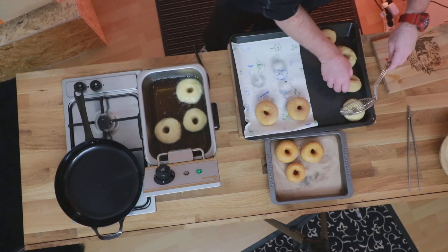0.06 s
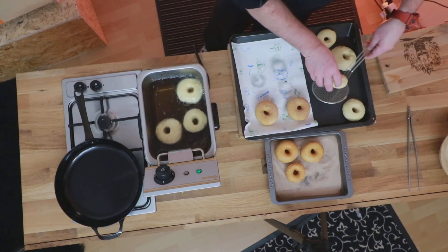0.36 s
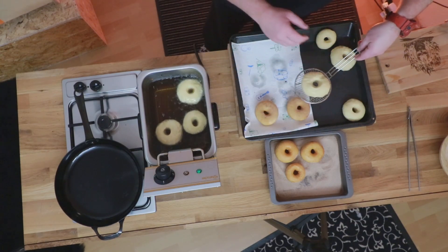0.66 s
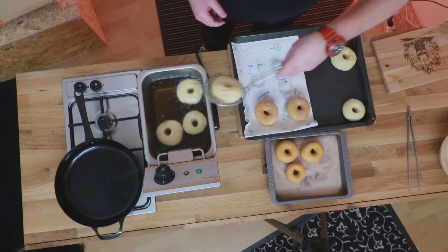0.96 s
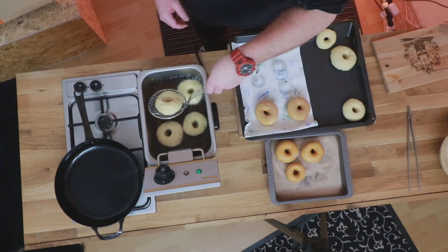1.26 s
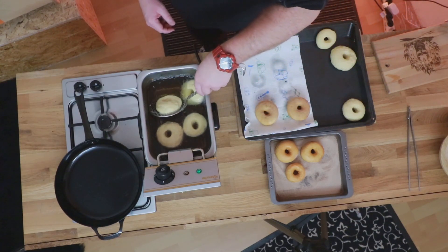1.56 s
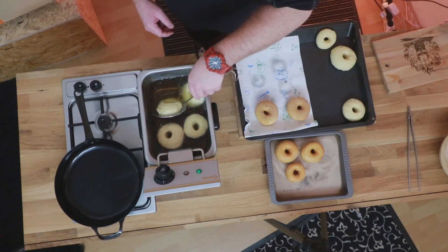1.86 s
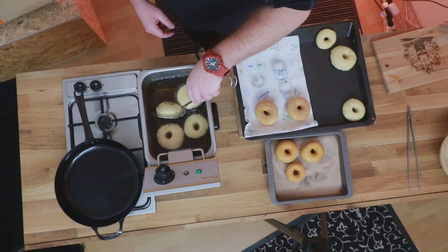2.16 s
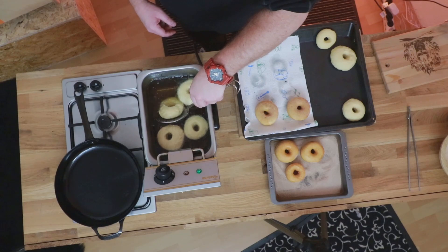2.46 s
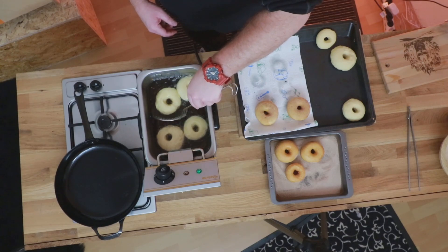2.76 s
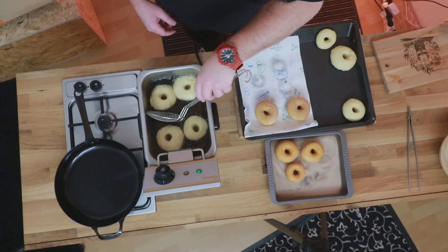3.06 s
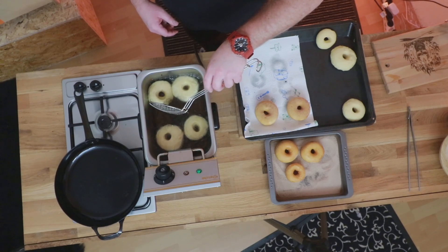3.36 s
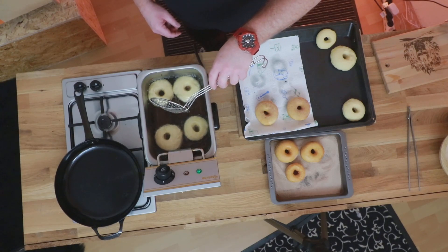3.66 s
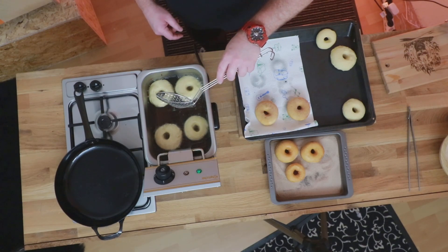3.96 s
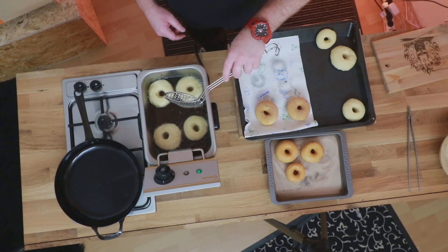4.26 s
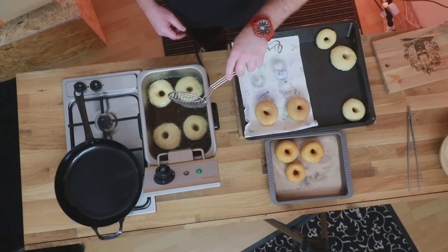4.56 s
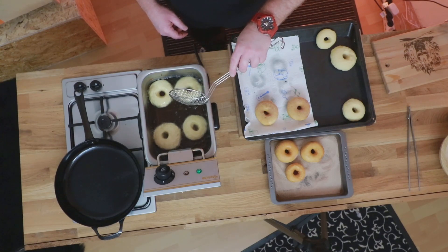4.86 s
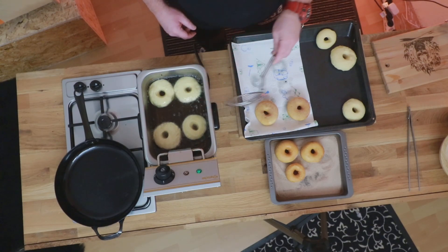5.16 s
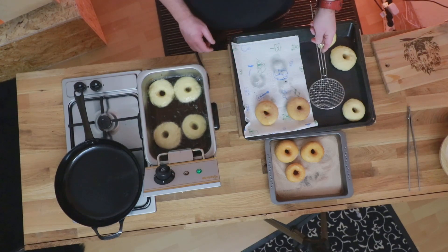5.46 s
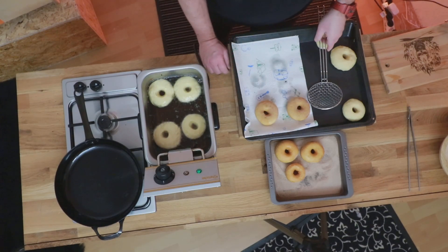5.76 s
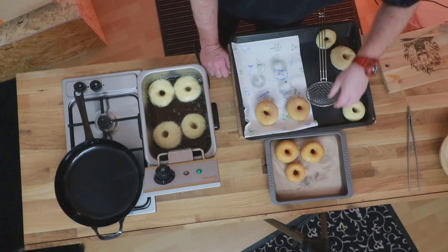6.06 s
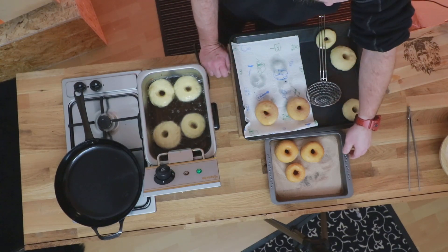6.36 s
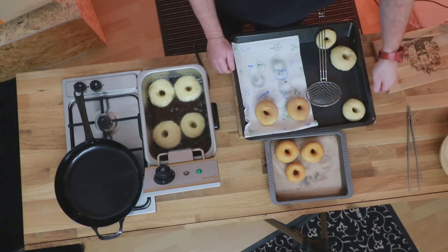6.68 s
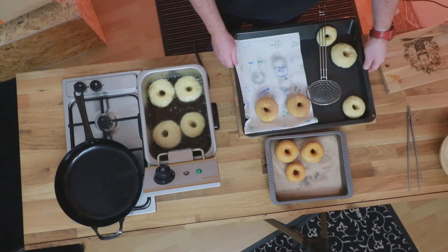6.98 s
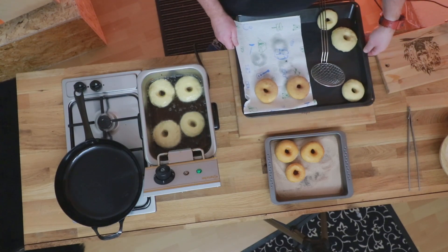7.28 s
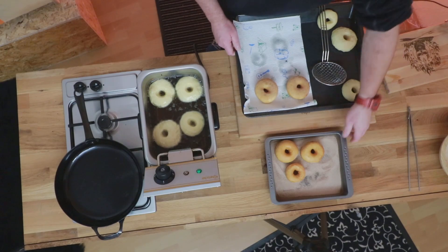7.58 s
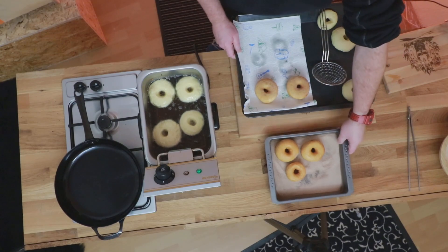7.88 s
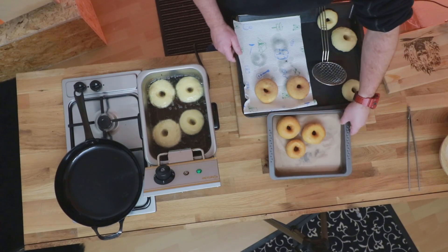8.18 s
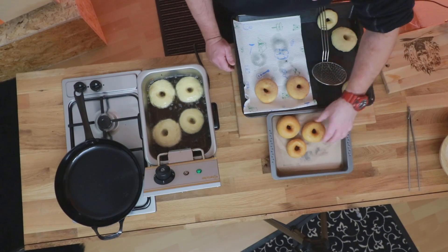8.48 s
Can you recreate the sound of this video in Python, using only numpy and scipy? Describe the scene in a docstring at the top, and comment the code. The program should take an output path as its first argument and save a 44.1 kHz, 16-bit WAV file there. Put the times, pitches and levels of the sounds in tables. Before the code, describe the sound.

Over faintly sizzling oil, a skimmer raps a fryer's rim and rattles onto a tray before a tin clonks against it.

```python
"""A wire skimmer works a doughnut fryer in a small kitchen: it lowers the dough in, knocks and scrapes
along the tank and is rapped on the rim, then dropped on a baking tray. The tray and a smaller tin slide
over the wooden worktop and knock together. Each hit is a set of ringing modes with a noisy crack and
tail; each scrape is a stream of tiny slips. Underneath, bursting steam bubbles keep the hot oil
sizzling faintly over a low room tone."""
import sys
import numpy as np
from scipy import signal
from scipy.fft import rfft, irfft
from scipy.io import wavfile

SR = 44100
rng = np.random.default_rng(int(sys.argv[2]) if len(sys.argv) > 2 else 0)


def wav_out(sig):
    """Save sig, one row per channel (or a flat mono array), as 16-bit PCM at SR to the path in sys.argv[1]."""
    wavfile.write(sys.argv[1], SR, np.round(np.clip(np.atleast_2d(sig).T, -1, 1) * 32767).astype(np.int16))


N = 384993

# Hits: (time [s], bass [dB], middle [dB], treble [dB], favoured pitch [Hz])
TANK_TOUCHES = [(1.388, -29.5, -35.5, -50.5, 716, -62), (1.41, -37, -36, -47, 705, -64),
                (1.448, -36.5, -42, -50, 930, -62), (1.982, -52, -54, -62, 378, -64),
                (2.052, -47, -61, -66, 394, -64), (2.115, -53, -65, -71, 710, -66),
                (2.17, -54, -62, -82, 465, -72), (2.222, -56, -62.5, -80, 397, -66),
                (2.482, -49, -57.5, -72, 417, -66), (2.569, -54, -49, -61, 940, -56),
                (2.598, -43.5, -43, -58, 864, -44), (2.732, -38.5, -43, -57, 500, -46),
                (2.826, -44, -47, -62, 930, -50), (2.864, -28, -30, -32.5, 1712, -31.5),
                (2.908, -35, -38, -48.5, 514, -43), (2.96, -46, -47, -53.5, 520, -58)]  # skimmer on the tank wall; extra column (wire ping [dB])
RIM_RAPS = [(4.614, -29.5, -34.5, -40, 470), (4.797, -16, -21.5, -24, 456),
            (4.93, -15.5, -19.5, -21.5, 480)]  # skimmer on the fryer's rim
TRAY_BLOWS = [(5.5985, -26.5, -25, -35.5, 1176), (5.615, -51, -53, -58, 300),
              (5.769, -55, -42.5, -50.5, 1190), (5.796, -49.5, -47, -58, 1000),
              (5.831, -49.5, -46, -58, 1190), (5.939, -38.5, -25, -38, 1040),
              (5.9655, -38, -24.5, -38.5, 980), (5.99, -45, -29, -45, 990), (6.012, -43, -42, -44.5, 1420),
              (6.043, -50, -44, -49, 1430), (6.9655, -44.5, -59, -76, 445), (7.3055, -41, -29.5, -49, 1070),
              (7.373, -42, -36, -53, 960), (7.456, -49.5, -53, -62, 436), (7.484, -47.5, -47.5, -66, 437)]  # blows and bounces on the baking tray
HANDLE_BOUNCES = [(5.9195, -37, -32.5, -30.0, 2320), (5.948, -52, -36, -48, 6840),
                  (6.027, -67, -45, -49.5, 6840), (6.072, -76, -51.5, -57, 2320)]  # the wire handle landing
WORKTOP_BUMPS = [(7.693, -42, -54.5, -72, 159), (7.712, -46, -70, -63, 118)]  # soft thuds on wood
TIN_KNOCKS = [(8.156, -25.5, -31, -59, 373), (8.2515, -22, -16, -33, 694)]  # tin against tray

# Ringing modes of each body: (pitch [Hz], relative level [dB], t60 [s])
TANK_RING = [(120.8, -18.5, 0.98), (221.2, -5, 0.25), (256.7, -2.5, 0.22), (376, 0.5, 0.49),
             (462, -4, 0.36), (517.3, -1, 0.26), (543.7, -4.5, 0.35), (720, -2, 0.19), (913, 1, 0.15),
             (937, -2.5, 0.23), (1115, -4, 0.3), (1450, -6, 0.25), (1700, -5, 0.18), (2665, -16, 0.18),
             (3944, -9.5, 0.14)]
WIRE_RING = [(3797, 3, 0.075), (3700, -5.5, 0.071), (4720, -9, .06)]
SHAFT_RING = [(2190, 1, 0.087), (2574, 1, 0.15), (4280, 5, 0.05), (4630, 3, .05), (4830, 1, 0.085)]
RIM_RING = [(124.5, -25, 0.74), (164, -15.5, 0.4), (217.7, -8, 0.33), (369, 5, 0.27), (442, -5.5, 0.21),
            (476.5, -6, 0.27), (517, -1, 0.24), (621, -5.5, 0.32), (631.5, -4, 0.3), (817, -12, 0.26),
            (943, -1.5, 0.14), (1274, -5.5, 0.21), (1727, -1.5, 0.12), (1427, -9.5, 0.11),
            (2982, -13.5, 0.12), (3190, -12, 0.17), (3420, -14, 0.13), (3890, -14.5, 0.15),
            (4680, -14, 0.12), (4400, -13, 0.13), (4395, -12.5, 0.14), (7060, -8, 0.09)]
TRAY_RING = [(120.7, -6, 0.76), (168, -3, 0.41), (203, -1.5, 0.23), (299, -2.5, 0.2), (437.3, 9, 0.087),
             (715, -7.5, 0.11), (974, 2, 0.073), (1035, 4.5, 0.14), (1110, 7.5, 0.04), (1180, 1.5, 0.08),
             (1424, -6.5, 0.22), (2130, -13, 0.094)]
HANDLE_RING = [(2330, -6.5, 0.038), (3610, -3.5, 0.043), (4400, -2, 0.051), (6840, -6, 0.029)]
WORKTOP_RING = [(117, 9, 0.17), (159, -6.5, 0.26)]
TIN_RING = [(132.3, -13, 0.64), (327.5, -12, 0.21), (371, -1, 0.098), (481, -5, 0.27), (620, -11.5, 0.24),
            (668, 1.5, 0.12), (908, 2, 0.078), (1223, -6, 0.1), (1340, -1.5, 0.095), (1540, -3, 0.049)]

# Colour of each body's wash of weaker modes: (frequency [Hz], relative level [dB])
TANK_WASH = [(60, -23), (190, -8.5), (290, -3.5), (527, 3.5), (615, -5), (698, -6), (924, 1.5),
             (1300, -5.5), (2090, -13), (3760, -24.5), (5590, -23), (9130, -29), (16000, -41)]
RIM_WASH = [(70, -43), (212, -20.5), (287, -20.5), (363, -10.5), (469, -1.5), (698, -12), (1740, -17),
            (2580, -23), (4220, -21), (6140, -35), (7060, -29), (16000, -45)]
TRAY_WASH = [(60, -20), (118, -10), (301, -1.5), (566, -8), (991, -7.5), (1600, -18), (1850, -15.5),
             (2350, -29), (16000, -46.5)]
HANDLE_WASH = [(88, -26), (150, -4), (1600, -6.5), (2310, -13), (2980, -31.5), (3550, -38), (3920, -10),
               (13700, -20.5), (16000, -21)]
WORKTOP_WASH = [(95, -26), (135, 2.5), (300, -16), (1200, -29.5), (16000, -57.5)]
TIN_WASH = [(70, -34), (225, 4), (428, -2.5), (661, 0), (765, -14), (884, -1.5), (1330, -10), (2010, -20.5),
            (2160, -22.5), (3950, -32), (6240, -29.5), (16000, -47)]

# Gestures: (start [s], length [s], level [dB])
DOUGH_NUDGES = [(0.0, 0.067, -57.5), (.12, 1.16, -64.5), (.41, 0.15, -60), (.55, 0.16, -52)]  # dough nudged and scooped up
SHAFT_SLIDES = [(1.395, 0.11, -46.5), (1.55, 0.5, -57.5), (1.69, 0, -56.5)]  # shaft over the rim
OIL_FLARE = [(1.405, 0.12, -53.5)]  # wet dough meets hot oil
TANK_SCRAPES = [(1.44, 0.46, -43.5), (1.968, 0.13, -46)]  # skimmer along the tank
TRAY_SLIDES = [(6.08, 0.14, -62), (6.96, 0.083, -59), (7.04, 0.18, -54), (7.5, 0.8, -58.5),
               (8.672, 0.055, -50.5)]  # tray over the worktop
TIN_PUSHES = [(7.95, 0.075, -52), (8.012, 0.2, -38.5), (8.07, 0.13, -40.5)]  # tin eased off, then pushed into the tray

# Colour of the rubbing, the oil and the room tone: (frequency [Hz], relative level [dB])
DOUGH_EQ = [(80, -11), (271, -0.5), (369, -2), (515, 0.5), (1220, -2.5), (2430, -9), (9400, -21.5),
            (16000, -45)]
SIZZLE_EQ = [(2000, -10.5), (3200, -6), (4500, -1.5), (5500, -5.5), (6800, -0.5), (8000, -6.5),
             (10500, -4.5), (13000, -8), (16000, -11.5)]
FLARE_EQ = [(2000, 16), (10000, -15), (16000, -18)]
ROOM_EQ = [(12, -37.5), (20, -5), (49, -9.5), (143, -13), (240, -10), (511, -9), (897, -12.5),
           (3500, -30.5), (7700, -81)]
TANK_SCRAPE_EQ = [(80, -35), (480, -4), (650, -9), (937, -10.5), (1860, -19), (2540, -26), (3170, -32),
                  (10300, -36), (16000, -60)]
TRAY_SLIDE_EQ = [(88, -17), (150, -5), (354, -7.5), (431, -2.5), (1170, -7.5), (1630, -14), (1940, -13.5),
                 (7040, -24.5), (16000, -27.5)]
TIN_DRAG_EQ = [(80, -34.5), (378, 3), (461, -5.5), (687, -2), (937, -3), (1630, -19.5), (2780, -33.5),
               (7870, -42), (16000, -64.5)]

# Snaps of wire, sticky dough, paper and spitting oil: (time [s], level [dB], low cut [Hz], high cut [Hz])
DRY_TICKS = [(0.5551, -53, 990, 1790), (0.636, -60, 1300, 11000), (0.677, -56.5, 700, 4000),
             (0.91, -67, 900, 6500), (1.029, -55.5, 400, 3600), (2.204, -63.5, 9500, 10800),
             (3.948, -63.5, 3800, 5900), (4.583, -59.5, 1300, 6000), (4.594, -56, 2700, 11000),
             (4.612, -51, 1090, 9900), (4.634, -57, 7440, 12500), (4.654, -58, 3000, 12000),
             (6.364, -64.5, 500, 2980), (7.2632, -49, 3360, 4970), (7.894, -59.5, 5500, 12000),
             (8.157, -53.5, 2500, 5700)]
# Rasps of wire, dough, hand, tray and paper:
# (start [s], length [s], level [dB], centre [Hz], width [octaves])
LIGHT_RASPS = [(0.555, 0.084, -59, 6000, 1.6), (1.683, 0.055, -55, 2230, 0.51),
               (6.829, 0.033, -55.5, 2290, 0.74), (7.299, 0.015, -35.5, 1460, 0.82),
               (7.668, 0.072, -61, 6950, 0.89)]
# Air escaping under the dough: (time [s], pitch [Hz], level [dB], t60 [s])
AIR_BUBBLES = [(1.735, 670, -33, 0.035), (1.805, 541, -39, 0.25)]
# The kitchen's decay: (frequency [Hz], t60 [s])
ROOM_DECAY = [(60, 1), (130, 0.84), (300, 0.28), (1000, 0.23), (4000, 0.19), (8000, 0.16), (16000, 0.11)]
# Bass, middle and treble bands of a hit: (low edge [Hz], high edge [Hz])
HIT_BANDS = [(85, 700), (700, 2500), (2500, 16000)]

BLOW_S, RING_S = .02, .7  # a hit's level is set over its first BLOW_S; it is cut off at RING_S
CUTOFF_HZ = 16000


def from_db(db):
    """Decibels to gain."""
    return 10 ** (np.asarray(db) / 20)


def rms_one(x):
    """Scale to unit rms."""
    return x / np.sqrt(np.mean(x ** 2) + 1e-20)


def at_hz(points, hz):
    """Read a table along a log-frequency axis."""
    known_hz, values = np.transpose(points)
    return np.interp(np.log(hz), np.log(known_hz), values)


def band(x, low, high, order=3):
    """Causal band-pass."""
    return signal.sosfilt(signal.butter(order, [low, high], "band", fs=SR, output="sos"), x)


def coloured(x, eq):
    """Shape a steady signal with an EQ curve that rolls off beyond its ends; rms 1."""
    hz = np.maximum(np.fft.rfftfreq(N, 1 / SR), 1)
    roll_off = 1 / np.sqrt((1 + (hz / eq[-1][0] / 2) ** 8) * (1 + (eq[0][0] / hz / 2) ** 8))
    return rms_one(irfft(rfft(x) * from_db(at_hz(eq, hz)) * roll_off, N))


def grains(per_s, spread_db, smooth):
    """Tiny random clicks of uneven size over a share of smooth noise."""
    sizes = from_db(spread_db * np.minimum(rng.exponential(1, N), 4)) * rng.choice([-1, 1], N)
    return rms_one(sizes * (rng.random(N) < per_s / SR)) + smooth * rng.standard_normal(N)


def strokes(rows, attack_s, release_s, easing_db_per_s=0):
    """Envelope of a set of gestures: each builds up, holds or eases off, then dies away."""
    power = 0
    for start, length, db in rows:
        age = np.maximum(np.arange(N) / SR - start, 0)
        held = np.minimum(age, length)
        attack, release = 1 - np.exp(-age / attack_s), np.exp((held - age) / release_s)
        power += (from_db(db - easing_db_per_s * held) * attack * release) ** 2
    return np.sqrt(power)


def wander(per_s):
    """Random modulation: straight lines between random values."""
    now = np.arange(N)
    return np.interp(now * per_s / SR, now, rng.standard_normal(N))


def surges():
    """Gain of a scrape as the hand presses unevenly."""
    return from_db(3.5 * wander(per_s=45))


def waver(x, share, per_s):
    """The point of contact wanders, and the pitch of the ringing wanders with it."""
    now = np.arange(N)
    return np.interp(now + np.cumsum(share * wander(per_s)), now, x)


def resonate(force, modes):
    """Drive a body's modes with a continuous force; rms 1."""
    out = 0
    for hz, db, t60 in modes:
        radius, angle = from_db(-60 / (t60 * SR)), 2 * np.pi * hz / SR
        poles = [1, -2 * radius * np.cos(angle), radius ** 2]
        out += from_db(db) * signal.lfilter([0, np.sin(angle)], poles, force)
    return rms_one(out)


def wash(eq, crack_s, tail_db, tail_tilt_db, partials_db, count):
    """A body's many weaker modes, one row a hit: a quick crack, then a tail that dies band by band."""
    t = np.arange(int(RING_S * SR)) / SR
    padded = len(t) + 4000  # run-in for the filters
    # the same body answers every hit, each time a little differently
    noise = rng.standard_normal((2, 1, padded)) + .6 * rng.standard_normal((2, count, padded))
    # scattered treble partials stand out of the wash
    cycles = rng.uniform(1300, 16000, (60, 1)) * np.arange(padded) / SR + rng.random((60, 1))
    partials = rng.normal(1, 0.44, (count, len(cycles))) @ np.sin(2 * np.pi * cycles)
    noise += from_db(partials_db) * rms_one(partials)
    edges = np.geomspace(45, 17000, 23)
    out = 0
    for k, (low, high) in enumerate(zip(edges, edges[1:])):
        hz = np.sqrt(low * high)
        crack = np.exp(-t / (crack_s + 1 / hz))
        tail = from_db(tail_db + tail_tilt_db * np.log2(hz / 1000) - 60 * t / at_hz(ROOM_DECAY, hz))
        noise_band = band(noise[k % 2], low, high, order=2)[:, -len(t):]
        out += from_db(at_hz(eq, hz)) * rms_one(crack + tail) * noise_band
    echo = np.pad(out, ((0, 0), (int(.0048 * SR), 0)))[:, :len(t)]  # slap off the worktop
    return rms_one(out - from_db(-12.5) * echo)


def struck(hits, modes, eq, wash_db, crack_s, tail_db, tail_tilt_db, contact_s, partials_db=-20):
    """Hits on one body; where and how hard each lands sets its bass, middle, treble and favoured modes."""
    t = np.arange(int(RING_S * SR)) / SR
    out = np.zeros(N + len(t))
    hits, modes_hz = np.array(hits), np.array(modes)[:, 0]
    rings = np.array([from_db(db - 60 * t / t60) * np.sin(2 * np.pi * (hz * t + rng.random()))
                      for hz, db, t60 in modes])
    octaves_off = np.log2(modes_hz / hits[:, 4:5])
    favour_db = 8 * np.exp(-(octaves_off / 0.076) ** 2)
    strengths = from_db(favour_db + rng.normal(0, 1.1, favour_db.shape))
    hardest_db = np.max(hits[:, 1:4])
    washes = wash(eq, crack_s, tail_db, tail_tilt_db, partials_db, count=len(hits))
    for (s, *levels_db), strength, weak_modes in zip(hits[:, :4], strengths, washes):
        # gentle touches have a slower attack than hard ones
        rise_s = contact_s * from_db(.5 * (hardest_db - max(levels_db)))
        blow = (rms_one(strength @ rings) + from_db(wash_db) * weak_modes) * (1 - np.exp(-t / rise_s))
        for (low, high), db in zip(HIT_BANDS, levels_db):
            part = band(blow, low, high)
            out[int(s * SR):][:len(t)] += from_db(db) * part / np.std(part[:int(BLOW_S * SR)])
    return out[:N]


def room_tone():
    """A low, steady bed of kitchen noise."""
    return from_db(-66.5) * coloured(rng.standard_normal(N), ROOM_EQ)


def oil_sizzle(start_db=-74.5, steady_db=-66, growth_s=1.35):
    """Steam bubbles burst at the surface: the sizzle fades up, and flares as the wet dough goes in."""
    level_db = steady_db + (start_db - steady_db) * np.exp(-np.arange(N) / SR / growth_s)
    bursts = grains(per_s=5000, spread_db=4.4, smooth=.9)
    flare = strokes(OIL_FLARE, attack_s=0.0095, release_s=0.087) * coloured(bursts, FLARE_EQ)
    return from_db(level_db) * coloured(bursts, SIZZLE_EQ) + flare


def dough_rub():
    """The dough catches and slips in tiny steps as it is scooped up."""
    slips = grains(per_s=1500, spread_db=3.3, smooth=0.88)
    return strokes(DOUGH_NUDGES, attack_s=0.0048, release_s=0.045) * coloured(slips, DOUGH_EQ)


def swishes():
    """Light glancing contacts, each a fine grain in a band of its own."""
    grain = grains(per_s=2800, spread_db=1.4, smooth=0.73)
    out = 0
    for start, length, db, hz, octaves in LIGHT_RASPS:
        edge_ratio = 2 ** (octaves / 2)
        rasp = band(grain, hz / edge_ratio, min(hz * edge_ratio, CUTOFF_HZ), order=2)
        out += strokes([(start, length, db)], attack_s=0.029, release_s=0.026) * rms_one(rasp)
    return out


def ticks(snap_s=0.00068, trail_db=-18):
    """Tiny snaps, each in a band of its own, with a faint trail of room."""
    t = np.arange(int(RING_S * SR)) / SR
    out = np.zeros(N + len(t))
    decay = np.exp(-t / snap_s) + from_db(trail_db - 60 * t / at_hz(ROOM_DECAY, CUTOFF_HZ))
    for s, db, low, high in DRY_TICKS:
        snap = band(rng.standard_normal(len(t)) * decay, low, high, order=2)
        out[int(s * SR):][:len(t)] += from_db(db) * snap / np.std(snap[:int(BLOW_S * SR)])
    return out[:N]


def tank_knocks():
    """Dipped in the oil, the skimmer touches the tank wall and sets it ringing."""
    return struck(TANK_TOUCHES, TANK_RING, TANK_WASH, wash_db=-2.5, crack_s=0.0027,
                  tail_db=20, tail_tilt_db=1, contact_s=0.00058, partials_db=0.5)


def wire_pings(graze_s=0.0032):
    """The skimmer's wires graze the wall and ring briefly, with a new balance at each touch."""
    t = np.arange(int(RING_S * SR)) / SR
    out = np.zeros(N + len(t))
    rings = np.array([from_db(db - 60 * t / t60) * np.sin(2 * np.pi * hz * t)
                      for hz, db, t60 in WIRE_RING])
    rings *= 1 - np.exp(-t / graze_s)
    for s, *_, ping_db in TANK_TOUCHES:
        out[int(s * SR):][:len(t)] += from_db(ping_db + rng.normal(0, 3.5, len(rings))) @ rings
    return out[:N]


def shaft_chatter():
    """The skimmer's shaft slips over the rim in uneven jerks; each one clicks and sets it ringing."""
    slips = grains(per_s=400, spread_db=2.5, smooth=0.35) * surges()
    ring = from_db(-3) * waver(resonate(slips, SHAFT_RING), share=.007, per_s=40)
    clicks = from_db(-11) * rms_one(band(slips, 1760, 12000))
    return strokes(SHAFT_SLIDES, attack_s=0.01, release_s=0.039, easing_db_per_s=37.5) * (ring + clicks)


def tank_scrape():
    """The wires drag along the tank and keep its wall ringing, easing off as they go."""
    slips = grains(per_s=390, spread_db=1, smooth=0.89) * surges()
    rasp = from_db(-8) * coloured(slips, TANK_SCRAPE_EQ)
    ring = from_db(-7) * waver(resonate(slips, TANK_RING), share=.012, per_s=14)
    return strokes(TANK_SCRAPES, attack_s=0.0064, release_s=0.069, easing_db_per_s=14.5) * (rasp + ring)


def bubbles():
    """Air escapes under the dough in large bubbles that ring and rise in pitch."""
    out = 0
    for s, hz, db, t60 in AIR_BUBBLES:
        age = np.maximum(np.arange(N) / SR - s, 0)
        swell = 1 - np.exp(-age / (0.054 * t60))
        chirp = np.sin(2 * np.pi * hz * age * (1 + 0.056 * age / t60))
        out += from_db(db - 60 * age / t60) * swell * chirp
    return out


def rim_raps():
    """The skimmer is rapped on the fryer's rim: one light clang, two hard ones."""
    return struck(RIM_RAPS, RIM_RING, RIM_WASH, wash_db=-1, crack_s=0.0037,
                  tail_db=3.5, tail_tilt_db=-7, contact_s=0.0012, partials_db=-2)


def tray_clatter():
    """The baking tray clanks under sharp blows and bounces, starting with the dropped skimmer."""
    return struck(TRAY_BLOWS, TRAY_RING, TRAY_WASH, wash_db=-3, crack_s=0.002,
                  tail_db=3, tail_tilt_db=-5, contact_s=0.00023, partials_db=-4)


def handle_rattle():
    """The skimmer's wire handle lands and rattles to rest in short, bright clinks."""
    return struck(HANDLE_BOUNCES, HANDLE_RING, HANDLE_WASH, wash_db=1.5, crack_s=0.0026,
                  tail_db=5, tail_tilt_db=-4.5, contact_s=0.00045, partials_db=-3)


def tray_slide():
    """The tray catches and slips over the wood with a fine-grained hiss."""
    slips = grains(per_s=3000, spread_db=3.8, smooth=1)
    return strokes(TRAY_SLIDES, attack_s=0.0091, release_s=0.12) * coloured(slips, TRAY_SLIDE_EQ)


def worktop_bumps():
    """Soft contacts thud in the worktop's low modes."""
    return struck(WORKTOP_BUMPS, WORKTOP_RING, WORKTOP_WASH, wash_db=-2, crack_s=0.0039,
                  tail_db=-4, tail_tilt_db=-1, contact_s=.002)


def tin_drag():
    """The small tin catches and slips over the wood with a hollow rasp."""
    slips = grains(per_s=900, spread_db=1.6, smooth=0.87)
    return strokes(TIN_PUSHES, attack_s=0.0059, release_s=0.045) * coloured(slips, TIN_DRAG_EQ)


def tin_knocks():
    """The tin runs into the tray with a double clonk."""
    return struck(TIN_KNOCKS, TIN_RING, TIN_WASH, wash_db=1, crack_s=0.006,
                  tail_db=-4, tail_tilt_db=0, contact_s=0.00045, partials_db=-11.5)


def scene():
    """The mono mix, heard from above the worktop."""
    bed = room_tone() + oil_sizzle()
    handling = dough_rub() + swishes() + ticks()
    fryer = tank_knocks() + wire_pings() + shaft_chatter() + tank_scrape() + bubbles() + rim_raps()
    worktop = tray_clatter() + handle_rattle() + tray_slide() + worktop_bumps()
    tin = tin_drag() + tin_knocks()
    return (bed + handling + fryer + worktop + tin)[None]


def record(dry):
    """A steep low-pass takes off the very top."""
    return signal.sosfilt(signal.ellip(12, .1, 90, CUTOFF_HZ, fs=SR, output="sos"), dry)


dry = scene()
out = record(dry)
wav_out(out)
```